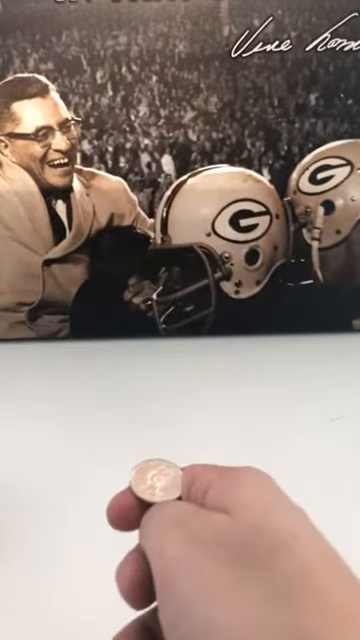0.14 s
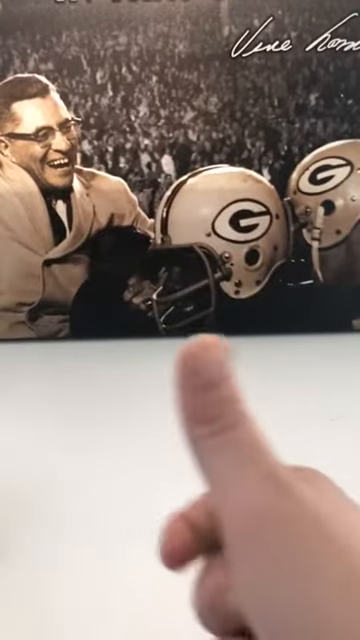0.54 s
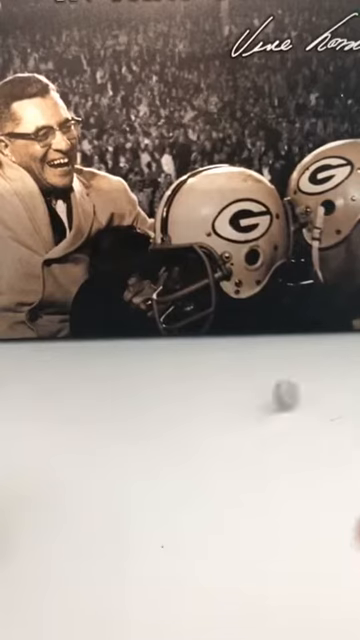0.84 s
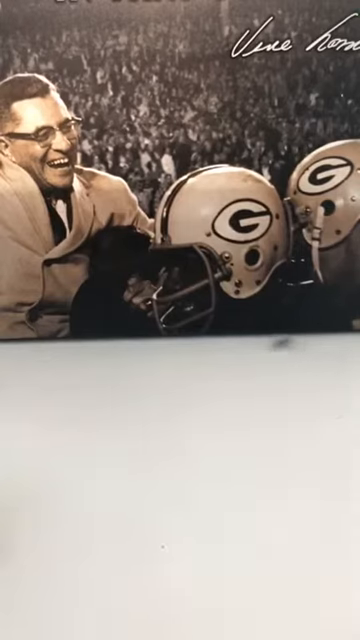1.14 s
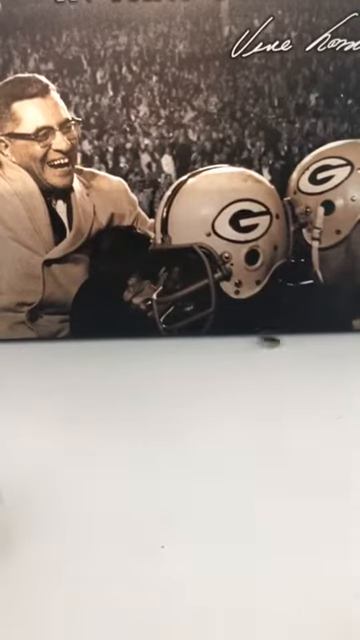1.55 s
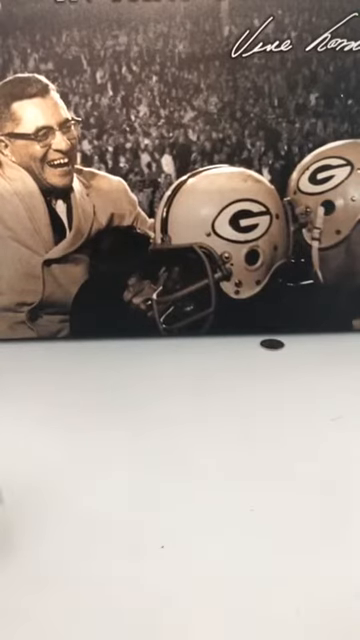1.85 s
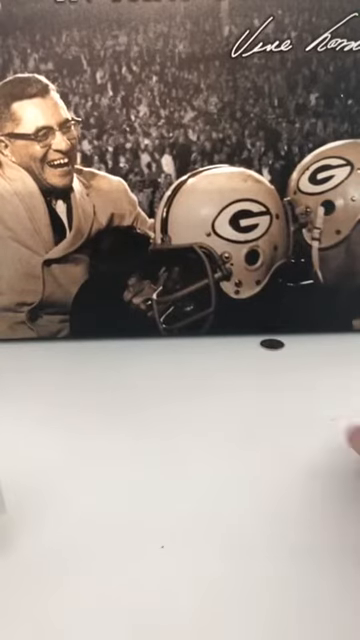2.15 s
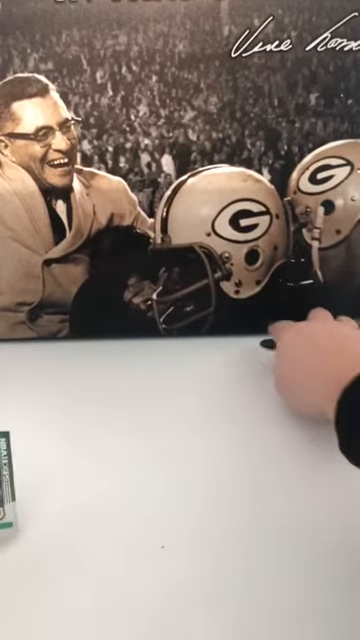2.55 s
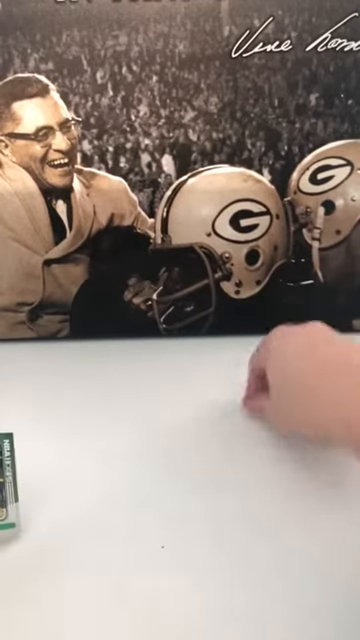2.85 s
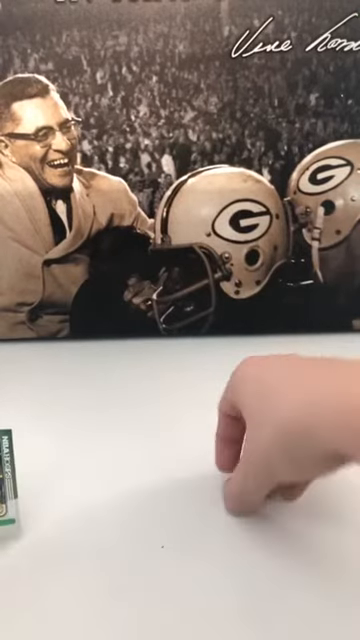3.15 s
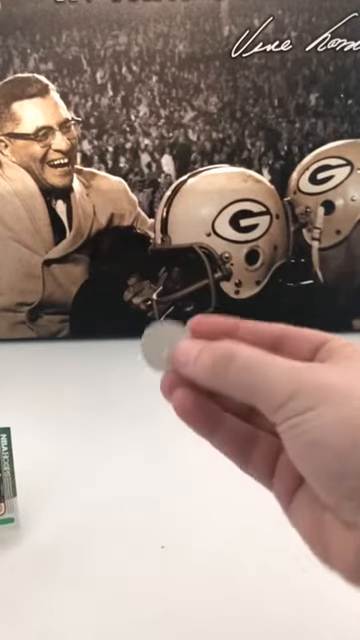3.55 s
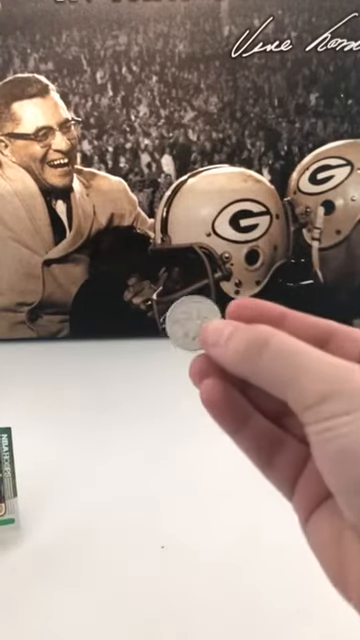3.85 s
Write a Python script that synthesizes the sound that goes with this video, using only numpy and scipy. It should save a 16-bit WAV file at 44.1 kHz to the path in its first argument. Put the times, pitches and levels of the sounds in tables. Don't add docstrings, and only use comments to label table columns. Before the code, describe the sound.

A coin is flicked, cracks onto a hard table, bounces, rolls, settles, then is dragged back

```python
import sys
import numpy as np
from scipy import signal
from scipy.fft import rfft, irfft
from scipy.io import wavfile
from scipy.ndimage import uniform_filter1d, map_coordinates

SR = 44100
rng = np.random.default_rng(int(sys.argv[2]) if len(sys.argv) > 2 else 0)


def ratio(d):
    e = np.asarray(d, float) / 20
    return 10 ** e


def wrap_up_sound(samples):
    columns = np.atleast_2d(samples).T
    tamed = np.clip(columns, -1, 1)
    steps = np.round(tamed * 32767).astype(np.int16)
    wavfile.write(sys.argv[1], SR, steps)


N = 176400
T = np.arange(N) / SR


def unit(x):
    return x / np.sqrt(np.mean(x ** 2))


def colour(x, points):
    p = np.array(points)
    f = np.fft.rfftfreq(2048, 1 / SR)
    log_gain = np.interp(np.log(f + 1), np.log(p[:, 0]), p[:, 1]) * np.log(10) / 20
    cepstrum = irfft(log_gain)
    cepstrum[1:1024] *= 2
    cepstrum[1025:] = 0
    response = irfft(np.exp(rfft(cepstrum)))
    return signal.fftconvolve(x, response)[:len(x)]


def band(x, lo_hz, hi_hz):
    limits = [lo_hz, min(hi_hz, .45 * SR)]
    return signal.sosfilt(signal.butter(2, limits, "band", fs=SR, output="sos"), x)


def reson(x, hz, width_hz):
    return signal.lfilter(*signal.iirpeak(hz, hz / width_hz, fs=SR), x)


def curve(rows, column=1, power=1):
    r = np.array(rows)
    inside = np.minimum(T - r[0, 0], r[-1, 0] - T)
    gate = np.clip(inside / .004 + 1, 0, 1)
    return ratio(power * np.interp(T, r[:, 0], r[:, column])) * gate


def grit(per_s, spread_db):
    hit = rng.random(N) < per_s / SR
    size = rng.standard_normal(N) * ratio(spread_db * rng.exponential(size=N))
    return unit(hit * size)


def flutter(per_s, depth_db):
    k = int(SR / per_s)
    wander = uniform_filter1d(uniform_filter1d(rng.standard_normal(N), k), k)
    return ratio(depth_db * unit(wander))


def after(s):
    return np.maximum(T - s, 0), T >= s


def fading_tone(start_s, hz, db, t60_s):
    u, on = after(start_s)
    return ratio(db - 60 * u / t60_s) * on * np.sin(2 * np.pi * hz * u)


def bursts(rows, contacts_s):
    out = np.zeros(N)
    u = np.arange(3000) / SR
    for (s, db), contact_s in zip(rows, contacts_s):
        i = int(s * SR)
        noise = rng.standard_normal(3000)
        shape = (1 - np.exp(-u / .0003)) * np.exp(-(u / contact_s) ** 1.7)
        burst = noise * shape
        burst = (burst * np.linalg.norm(shape) / np.linalg.norm(burst))[:N - i]
        out[i:i + len(burst)] += ratio(db) * burst
    return out


# pitch_hz, then level_db, then t60_s
TABLE_HZ = [75, 140, 260, 458, 548, 660, 990, 1245, 1345, 1470, 1554, 1795, 2130, 2280]
TABLE_MODE_DB = [-12.5, -16.5, -12.5, 0.5, -7, -6.5, -2, -2, -12, 0, 2, -9.5, -4.5, -9]
TABLE_T60_S = [.12, .1, 0.07, 0.084, 0.082, 0.072, 0.054, .11, 0.13, 0.039, .09, 0.089, 0.023, 0.061]


def table(force):
    out = 0
    for hz, db, t60 in zip(TABLE_HZ, TABLE_MODE_DB, TABLE_T60_S):
        out = out + ratio(db) * reson(force, hz, 1.6 / t60) * np.sqrt(t60 * 100)
    return out


# start_s, peak_db, treble_db, top_db (highest treble), contact_s
HITS = [(0.6686, 3, 1, -14, 0.0031), (0.686, -9.5, -8, -14, .003), (0.6899, -8.5, -11, -15.5, 0.0035),
        (0.701, -12.5, -5, -10, 0.0037), (.738, -2, -10, -9.5, 0.005), (0.754, -5.5, -6.5, -17, 0.0034),
        (.852, 4.5, -15.5, -19.5, 0.0041), (.890, 0.5, -9, -21, 0.0036), (.923, -6, -16.5, -19.5, 0.005),
        (.948, -6.5, -12.5, -20, 0.0039), (.966, -7, -11.5, -22.5, 0.002), (.981, -18, -18, -23, 0.0035),
        (1.247, -26, -14, -34, 0.0046), (1.281, -29.5, -23.5, -24, 0.011), (1.336, -32, -8, -35, 0.0036),
        (1.649, -27.5, -22.5, -34.5, .004), (1.684, -1, -2, -1.5, 0.004), (1.721, -9.5, 3.5, -10.5, .004),
        (1.745, -16, -19, -8, 0.0055), (1.758, -18.5, 2, 2, 0.0044), (1.77, -17, -15, -10, 0.0033),
        (2.658, -26, -15, -27, 0.0049)]
# pitch_hz, level_db
KNOCK = [(60, -20), (500, -10), (1500, -3.5), (3200, -9.5), (5500, -19), (9000, -20.5)]


def landings():
    h = np.array(HITS)
    start_s, peak_db = h[:, 0], h[:, 1]
    contact_s = np.clip(h[:, 4], .002, .009)
    body = bursts(h[:, :2], contact_s)
    treble_ref_db = -4.5
    bright, top = (bursts(np.c_[start_s, peak_db + h[:, k] - treble_ref_db], contact_s * 1.21)
                   for k in (2, 3))
    crack = band(body, 60, 2700) + band(bright, 2600, 5500) + band(top, 5500, 15000)
    force = body * ratio(-12 * (T > 1.5))
    return ratio(7.5) * colour(crack, KNOCK) + ratio(-1.5) * table(force)


def edge(spans, points, treble, per_s, spread_db, ring_db, treble_db, hiss_db, steep, patchy_db):
    g, h = grit(per_s, spread_db), grit(per_s, spread_db)
    split_hz = 1800
    rub = unit(band(colour(g, points), 79, split_hz))
    body = unit(rub + ratio(ring_db) * unit(table(g))) * flutter(54, patchy_db)
    bright = ratio(treble_db) * unit(band(colour(h, treble), split_hz, 8000)) * flutter(90, patchy_db)
    hiss = ratio(hiss_db) * reson(h, 9300, 360)
    out = 0
    for rows in spans:
        out = out + curve(rows) * (body + curve(rows, column=2) * bright)
        out = out + curve(rows, power=steep) * hiss
    return out


# start_s, level_db, treble_db
SKID = [
    (.684, -17, -4),
    (.7, -17.5, -2),
    (.73, -24.5, 3),
    (.76, -21.5, -8.5),
    (.8, -35, 0),
    (.845, -51, -3),
]
SETTLE = [
    (1.691, -30, 0.9),
    (1.72, -32, 0.85),
    (1.75, -34.5, 0.22),
    (1.779, -41.5, -0.81),
    (1.821, -54, -0.72),
]
# pitch_hz, level_db
SKID_COLOUR = [(100, -7.5), (460, -2.5), (800, -9.5), (1500, 0)]
SKID_TREBLE = [(1500, -5.5), (2500, -4), (4400, -4.5), (5500, -14), (8200, -33.5), (10000, -37)]


def skid():
    return edge((SKID, SETTLE), SKID_COLOUR, SKID_TREBLE, 7000, 1.8,
                ring_db=-11, treble_db=-1.0, hiss_db=7.5, steep=1.31, patchy_db=0.5)


# start_s, level_db, treble_db
ROLL = [(.97, -31, -7), (1.02, -36.5, -17), (1.05, -31.5, -7.5), (1.07, -33.5, -9), (1.09, -31.5, -14),
        (1.13, -37.5, -12.5), (1.155, -40, -4.5), (1.18, -29, 7), (1.21, -36.5, 0), (1.24, -40.5, -10),
        (1.3, -42, -7.5), (1.33, -38.5, -9.5)]
WOBBLE = [(1.336, -38.5, -1.5), (1.36, -37.5, 10.5), (1.386, -29.5, 11.5), (1.42, -44, -1.5),
          (1.449, -49.5, -0.5), (1.475, -37, 9.5), (1.485, -28.5, 14), (1.515, -43, 13.5),
          (1.545, -41.5, 1.5), (1.584, -35.5, 15), (1.61, -40.5, 10.5), (1.63, -44, -4.5), (1.65, -38, 3.5),
          (1.681, -50, -6)]
# pitch_hz, level_db
ROLL_COLOUR = [(200, -12), (466, -8.5), (680, 8.5), (880, -2), (1200, 11), (1700, -4)]
ROLL_TREBLE = [(1500, -0.5), (2240, -6), (3000, -12), (4200, -17), (5500, -29.5), (10000, -46)]


def roll():
    return edge((ROLL, WOBBLE), ROLL_COLOUR, ROLL_TREBLE, 9000, 1.1,
                ring_db=-10, treble_db=-9, hiss_db=22.5, steep=2.07, patchy_db=1.3)


# start_s, level_db
RIM = [
    (1.0, -52),
    (1.04, -48.5),
    (1.085, -60),
    (1.1, -69),
]


def rim():
    return curve(RIM) * unit(reson(grit(14000, 1.7), 9000, 380))


# start_s, level_db, t60_s, damped_at_s; then the pitch_hz of each
RINGS = [
    (.416, -63, 1.5, .67),
    (.668, -46, .3, .72),
    (.715, -31.5, .75, 1.12),
    (.852, -44, .9, 1.14),
]
RING_HZ = [9130, 9135, 9819, 8790]


def coin():
    out = 0
    for hz, (s, db, t60, damped_s) in zip(RING_HZ, RINGS):
        damping = ratio(-650 * after(damped_s)[0])
        out = out + damping * fading_tone(s, hz, db, t60)
    return out


# start_s, level_db, bass_db, speed (1 = full)
DRAG = [(2.68, -53, -0.5, .55), (2.72, -37, -3, 0.76), (2.76, -30, -10, .86), (2.8, -27.5, -18.5, 0.97),
        (2.9, -26, -23, 1.05), (3.0, -27.5, -18.5, .97), (3.06, -32, -11, 0.81), (3.1, -38.5, -17, 0.83),
        (3.12, -47.5, -11, .7), (3.2, -55.5, 6.5, 0.68)]
# start_s, level_db, bass_db
PRY = [(3.203, -52.5, -1), (3.21, -41, 0), (3.224, -36.5, -9.5), (3.238, -34.5, -6), (3.25, -41, -10.5),
       (3.265, -34, -2.5), (3.285, -52.5, 7.5), (3.34, -70, -1)]
# pitch_hz at full speed, width_hz, level_db
DRAG_PEAKS = [(1603, 210, 20), (2140, 280, 15.5), (2647, 240, 14.5), (3310, 480, 15), (4190, 490, 13.5),
              (5700, 230, 5.5)]


def drag_and_pry():
    g, h = grit(14000, 1.7), grit(14000, 1.7)
    grain = sum(ratio(db) * reson(g, hz, width) * flutter(33, 1.6) for hz, width, db in DRAG_PEAKS)
    grain = band(grain, 1440, 4700)
    r = np.array(DRAG)
    speed = np.clip(np.interp(T, r[:, 0], r[:, 3]), .3, 1.3)
    moving = unit(map_coordinates(grain, [np.cumsum(speed)], mode="mirror"))
    high = unit(band(h, 3500, 11000))
    low = unit(band(band(h, 455, 1900), 350, 2700))
    rub = curve(DRAG) * (moving + curve(DRAG, column=2) * low)
    rub = rub + ratio(-6) * curve(DRAG, power=1.3) * high
    scrape = unit(band(grain, 860, 3000)) + ratio(-15) * band(high, 3500, 8200)
    return rub + curve(PRY) * (scrape + curve(PRY, column=2) * low)


# start_s, then peak_db, decay_s
TICK_S = [.415, .422, 3.6605, 3.664, 3.6663, 3.6685, 3.6725, 3.675, 3.68, 3.974, 3.98, 3.988]
TICKS = [(-40.5, 0.0019), (-39, .006), (-14.5, 0.0014), (-10.5, 0.003), (-6.5, 0.0011), (-10, 0.0023),
         (-9.5, 0.0016), (-19.5, 0.0034), (-42.5, 0.004), (-39, .004), (-28.5, .008), (-30, 0.011)]
# pitch_hz, level_db
TICK_PEAKS = [(2780, -27), (3650, -16.5), (4680, -3.5), (5960, -6.5), (7140, -9.5), (7970, -1.5),
              (8850, -9)]


def nail_clicks():
    k = np.array(TICKS)
    x = bursts(np.c_[TICK_S, k[:, 0]], k[:, 1])
    treble = band(x, 3100, 8900)
    ring = sum(ratio(db) * reson(treble, hz, 495) for hz, db in TICK_PEAKS)
    return ratio(10.5) * ring + ratio(-15) * band(x, 200, 1600)


# start_s, then pitch_hz, width_hz, level_db, contact_s
SNAP_S = [3.231, 3.261, 3.647, 3.767, 2.512, .414, 2.705, 3.12, 3.98, 2.657, .708, 3.236]
SNAPS = [(2135, 180, -8, 0.013), (1242, 118, -1, .010), (8700, 260, -13.5, 0.022), (3650, 900, -28, 0.0029),
         (560, 430, -32.5, 0.056), (800, 1200, -30, 0.0071), (680, 100, -13, 0.068), (576, 890, -31, 0.12),
         (8200, 1900, -21.5, 0.035), (680, 170, -14, .006), (9550, 500, -9, .025),
         (1570, 200, -10.5, 0.014)]


def small_snaps():
    out = 0
    for s, (hz, width, db, contact_s) in zip(SNAP_S, SNAPS):
        x = bursts([(s, db)], [contact_s])
        y = reson(reson(x, hz, width), hz, width)
        level = np.linalg.norm(x) / np.linalg.norm(y) * np.sqrt(np.pi * width / (2 * SR))
        out = out + y * level
    return out


# start_s, from_hz, to_hz, length_s, level_db
POPS = [
    (3.675, 1500, 300, .012, -46),
    (3.701, 1200, 300, .008, -43),
    (3.732, 1230, 1400, .05, -56),
    (3.767, 1000, 300, .01, -54),
    (3.973, 1500, 300, .008, -48),
]


def skin_pops():
    out = 0
    for s, from_hz, to_hz, length_s, db in POPS:
        p = np.clip(after(s)[0] / length_s, 0, 1)
        cycles = length_s * (from_hz * p + (to_hz - from_hz) * p ** 2 / 2)
        out = out + ratio(db) * np.sin(np.pi * np.sqrt(p)) * np.sin(2 * np.pi * cycles)
    return out


# start_s, then pitch_hz, level_db, t60_s
BUMP_S = [2.238, 2.415, 2.68, 2.89, 2.96, 3.12, 3.2, 3.479, .416]
BUMPS = [
    (43, -35, 0.21),
    (41.8, -38, 0.23),
    (86, -31.5, 0.047),
    (120, -29, 0.1),
    (35, -37, 0.12),
    (197, -35, 0.028),
    (119, -42, 0.11),
    (400, -47.5, 0.035),
    (110, -46, 0.046),
]


def arm_bumps():
    return sum(fading_tone(s, *row) for s, row in zip(BUMP_S, BUMPS))


# pitch_hz, level_db
SLEEVE = [(1.9, -66), (2.15, -57), (2.35, -50.5), (2.42, -56.5), (2.55, -63.5), (2.66, -70.5)]
SLEEVE_COLOUR = [(500, 3), (2000, 3), (4000, 2), (10000, -9)]
# start_s, level_db
HUM = [(2.1, -69), (2.25, -58.5), (2.65, -57), (3.1, -73)]
# pitch_hz, level_db
AIR = [(20, -7), (70, -6.5), (172, -15), (261, -10), (441, -21.5), (543, -24), (2180, -32.5), (10500, -41)]


def background():
    n = rng.standard_normal((4, N))
    air = ratio(-60.5) * unit(colour(n[0], AIR))
    fan = ratio(-71) * unit(reson(n[1], 260, 12))
    sleeve = curve(SLEEVE) * unit(colour(n[2], SLEEVE_COLOUR))
    hum = curve(HUM) * unit(reson(n[3], 264, 6.5))
    return air + fan + sleeve + hum


def room(x, hand):
    u = np.arange(SR) / SR
    n = band(rng.standard_normal((2, SR)), 140, 6760)
    gap = np.clip(u / .008, 0, 1) ** 2
    early = n[0] * ratio(-60 * u / 0.26) * gap
    tail = n[1] * ratio(-60 * u / 0.96)
    early = ratio(-14) * early / np.linalg.norm(early)
    tail = ratio(-29.5) * tail / np.linalg.norm(tail)
    echoes = signal.fftconvolve(x + hand, early)
    return (echoes + signal.fftconvolve(x + ratio(-12) * hand, tail))[:N]


def scene():
    near = landings() + skid() + roll() + rim() + coin() + drag_and_pry()
    hand = nail_clicks() + small_snaps() + skin_pops() + arm_bumps()
    return (near + hand + room(near, ratio(-3) * hand) + background())[None]


def band_limit(x):
    return signal.sosfilt(signal.butter(12, 10870, fs=SR, output="sos"), x)


def record(dry):
    ceiling = .8
    x = ceiling * np.tanh(dry / ceiling)
    x = signal.sosfilt(signal.butter(6, 9750, fs=SR, output="sos"), x)
    x = signal.sosfilt(signal.ellip(10, .2, 60, 10050, fs=SR, output="sos"), x)
    return band_limit(x)


dry = scene()
out = record(dry)
wrap_up_sound(out)
```